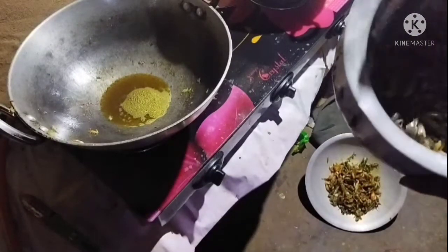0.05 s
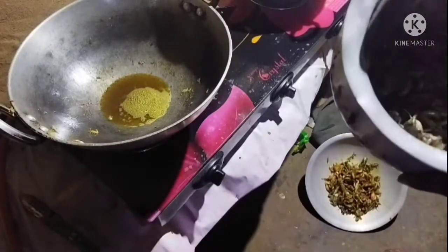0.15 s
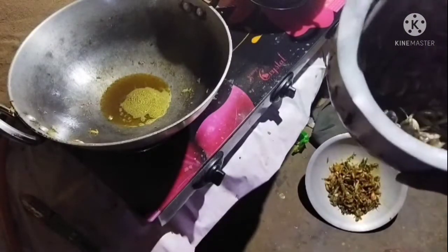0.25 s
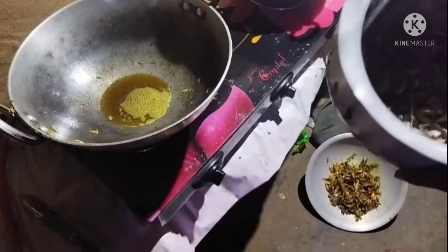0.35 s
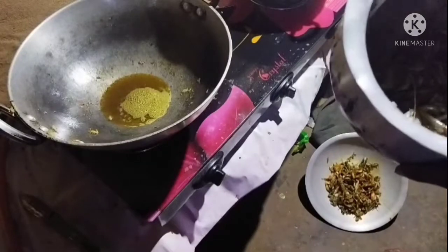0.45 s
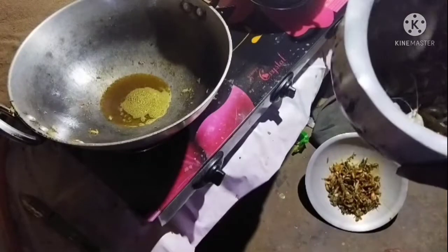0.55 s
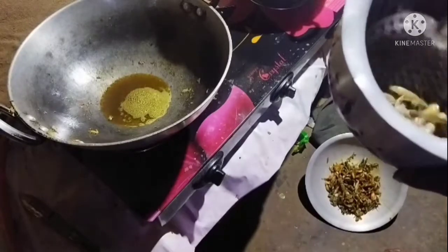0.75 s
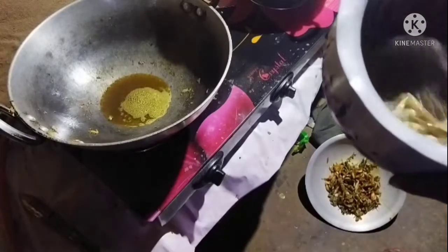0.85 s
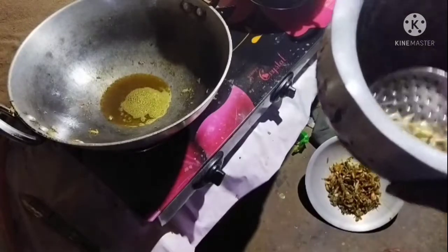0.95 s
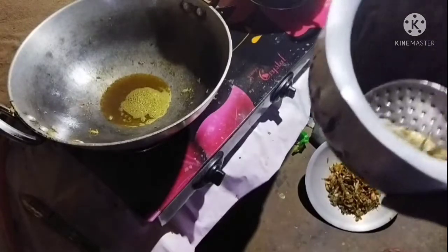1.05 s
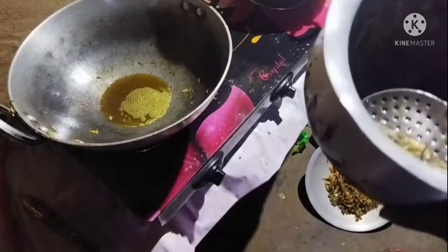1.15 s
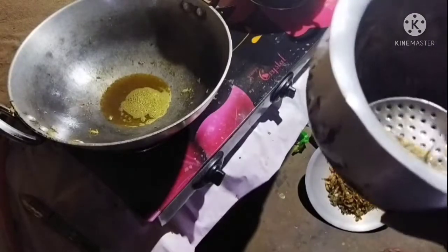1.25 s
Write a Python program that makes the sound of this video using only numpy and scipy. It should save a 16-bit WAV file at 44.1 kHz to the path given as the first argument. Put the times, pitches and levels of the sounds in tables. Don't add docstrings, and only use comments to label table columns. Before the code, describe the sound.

Two sharp metallic clanks of a skimmer against a pot, followed by light scraping and clinking outdoors

```python
import sys
import numpy as np
from scipy import signal
from scipy.fft import rfft, irfft
from scipy.io import wavfile
from scipy.ndimage import uniform_filter1d

SR = 44100
rng = np.random.default_rng(int(sys.argv[2]) if len(sys.argv) > 2 else 0)


def bounce(signal):
    frames = np.transpose(np.atleast_2d(signal))
    limited = np.clip(frames, -1, 1)
    pcm = np.round(limited * 32767).astype(np.int16)
    wavfile.write(sys.argv[1], SR, pcm)


def volts(x):
    e = np.asarray(x, float) / 20
    return 10 ** e


N = 57330

# pitch_hz, first_blow_db, second_blow_db, light_contact_db, t60_s
POT_MODES = [(207, -27, -39, -24, 0.017), (272, -43, -30.5, -6, 0.073), (524.7, -23.5, -28, -7, 0.077),
             (270, -55, -17.5, -20, 0.025), (340, -14.5, -20, -20, 0.034), (401, -20.5, -26, -10, 0.06),
             (438.7, -25.5, -20.5, -5.5, 0.13), (478.6, -15.5, -18, -2.5, 0.063),
             (581, -30.5, -45, -33, 0.093), (618, -41, -28.5, -10, 0.089), (666, -32.5, -58, -16, 0.23)]
RIM_MODES = [(1004, -41.5, -21.5, -9, 0.047), (1115, -23.5, -20, -4.5, 0.058),
             (1168.3, -23.5, -18, -0.5, 0.054), (1254, -31, -25.5, 0, 0.059), (1514, -38, -40.5, -12, 0.28),
             (1717, -71, -40, -12, 0.18), (1765, -27, -28.5, -0.5, 0.029), (1864, -30, -39, -15, .08)]
SKIMMER_MODES = [(2060, -28.5, -66, -7, 0.12), (2230, -24, -21.5, -8.5, 0.11),
                 (2307, -27.5, -35, -1.5, 0.081), (2593, -21, -54, -3.5, 0.13), (2740, -49, -11, 4, 0.03),
                 (2889, -14.5, -11.5, 2, 0.045), (2968, -13, -13, 1.5, 0.038), (3123, -42, -27, -1.5, 0.07),
                 (3269, -24.5, -55, 1, 0.047), (3350, -22, -25, 3.5, 0.07), (3514, -26, -30, -4, 0.094),
                 (3710, -45, -53, -9.5, 0.12), (4290, -33, -53, -22, 0.11), (4150, -50, -36, -8, 0.15)]
# pitch_hz, density_db (per Hz)
SHIMMER_COLOUR = [(2240, 7.5), (3800, -4.5), (4860, 1), (6610, 3.5), (7360, -8.5), (8770, 6), (11200, 2),
                  (12400, 3.5), (16000, -3)]
LIGHT_CONTACT = 3


def evened(x):
    return x / np.sqrt(np.mean(x ** 2) + 1e-20)


def read(points, hz):
    f, value = np.transpose(points)
    return np.interp(np.log(hz + 1), np.log(f + 1), value)


def coloured(x, points):
    hz = np.fft.rfftfreq(x.shape[-1], 1 / SR)
    floor = (points[0][0] * 0.077, -60)
    gain = volts(read([floor] + list(points), hz))
    return irfft(rfft(x) * evened(gain), x.shape[-1])


def slow_noise(size):
    return evened(uniform_filter1d(rng.standard_normal(N), size))


def dying(start, db, t60):
    t = np.arange(N) / SR - start
    rise = np.clip(t / 0.00065, 0, 1)
    return (t >= 0) * volts(db - 60 * np.maximum(t, 0) / t60) * rise


def mode(row, column, damping, skew):
    t = np.arange(SR // 4) / SR
    hz, t60 = row[0], damping * row[4]
    turn = 2 * np.pi * hz * t + 0.27 * skew * np.log(hz / 200)
    return volts(row[column] - 60 * t / t60) * np.sin(turn)


def ring(drive, modes, column, damping=0.7, bloom_s=0.0016):
    skews = rng.standard_normal((len(modes), 2, 1))
    bloom = 1 - np.exp(-np.arange(SR // 4) / SR / bloom_s)
    body = bloom * sum(mode(m, column, damping, skew) for m, skew in zip(modes, skews))
    return signal.fftconvolve(drive[None], body, axes=1)[:, :N]


def metal_noise(points):
    same, peak_db, peak_width_hz, count = 0.7, 12, 30, 160
    noise, hz = rng.standard_normal((3, N)), np.fft.rfftfreq(N, 1 / SR)
    ports = same * noise[0] + np.sqrt(1 - same ** 2) * noise[1:]
    peaks = np.zeros(len(hz))
    at = (rng.uniform(3600, 16000, count) * N / SR).astype(int)
    peaks[at] = rng.exponential(1, count)
    offset_hz = np.arange(-300, 301) * SR / N
    resonance = 1 / (1 + (offset_hz / peak_width_hz * 2) ** 2)
    fine = np.sqrt(1 + volts(2 * peak_db) * np.convolve(peaks, resonance, "same"))
    fine = fine / uniform_filter1d(fine, size=1500)
    return coloured(irfft(rfft(ports) * fine, N), points)


def hum():
    # pitch_hz, density_db (per Hz)
    hum_colour = [(35, -55), (62, -30), (83, -2.5), (118, -9.5), (220, 0.5), (363, -9.5), (516, -16),
                  (16000, -29.5)]
    # pitch_hz, likeness (0 to 1)
    hum_likeness = [(60, 0.84), (380, 0.79), (2400, 0.033), (15000, 0.05)]
    frames, hz = N // 256 + 5, np.fft.rfftfreq(1024, 1 / SR)
    a, b, c, d, patches = rng.standard_normal((frames, 513, 5)).T
    patches = evened(uniform_filter1d(uniform_filter1d(patches, 4, 0), 8, 1))
    same = np.clip(read(hum_likeness, hz), -1, 1)[:, None]
    left = a + 1j * b
    right = same * left + np.sqrt(1 - same ** 2) * (c + 1j * d)
    z = np.array([left, right]) * volts(read(hum_colour, hz)[:, None] + 0.5 * patches)
    return volts(-58.5) * evened(signal.istft(z, nperseg=1024, noverlap=768)[1][:, :N])


def motor():
    hz = 409 + 3 * slow_noise(2000)
    return volts(-67) * np.sin(2 * np.pi * np.cumsum(hz) / SR)


def bumps():
    # start_s, pitch_hz, level_db, t60_s
    bump_events = [
        (0.225, 90, -35, .025),
        (0.283, 81, -43.5, 0.086),
        (0.438, 90, -29, 0.03),
        (.5650, 60.6, -53, .04),
        (.8300, 40, -64, .05),
        (1.042, 113, -47, 0.098),
        (1.1400, 117, -65, 0.023),
        (1.233, 126, -49.5, 0.16),
    ]
    t, out = np.arange(N) / SR, np.zeros(N)
    for start, hz, db, t60 in bump_events:
        swing = np.sin(2 * np.pi * hz * (t - start))
        out += dying(start, db, t60) * np.clip((t - start) * hz, 0, 1) * swing
    return out


def yard(x):
    same, t60_s, first_s = 0.59, 0.2, 0.0059
    taps = np.zeros((2, SR // 2))
    at = np.arange(0, SR // 2 - 20, 20) + rng.integers(0, 20, (2, (SR // 2 - 1) // 20))
    np.put_along_axis(taps, at, rng.choice([-1., 1.], at.shape), 1)
    taps[0] = same * taps[1] + (1 - same) * taps[0]
    t = np.arange(SR // 2) / SR
    tail = taps * volts(-60 * t / t60_s) * (t > first_s)
    return signal.fftconvolve(x, tail / np.linalg.norm(tail[0]), axes=1)[:, :N]


def rub(slips, modes, best_hz):
    out = np.zeros((2, N))
    for m in modes:
        wander_db = 2.5 * slow_noise(round(0.035 * SR))
        favour_db = 5.5 * np.exp(-(np.log(m[0] / best_hz) / 0.074) ** 2)
        drive = slips * volts(wander_db + favour_db) * rng.choice([-1., 1.], N)
        tone = mode(m, LIGHT_CONTACT, 0.8, rng.standard_normal((2, 1)))
        out += signal.fftconvolve(drive[None], tone, axes=1)[:, :N]
    return out


def scrape():
    # start_s, pressure_db, then pot_db, rim_db and hiss_db (stroke speed) relative to pressure
    stroke = [(0.269, -37, -15, -8, 1.5), (0.334, -51, -23, -5, -4), (.39, -60, -15, -9, 8.5),
              (0.478, -45, -2.5, -12, 1), (0.552, -50.5, 4, 4.5, 7.5), (0.582, -56, 6.5, 0.5, 0),
              (0.607, -48.5, 3, 1, 2.5), (0.679, -52.5, -3, 3, 4.5), (0.716, -59, 3.5, -0.5, 8),
              (0.768, -48.5, -5, 3.5, 4), (0.804, -53, 5.5, 4.5, 5.5), (.821, -60, 6, 8, 9.5),
              (.84, -52.5, -5.5, -3, 1), (.87, -52, -6, -7, 1.5), (0.918, -51, -4, -2.5, 3),
              (0.992, -39.5, -17.5, -8, -2.5), (1.042, -44.5, -14, -3.5, 2.5), (1.117, -58, -8, -7.5, 2),
              (1.218, -47.5, -7, -2.5, -0.5), (1.268, -55, -12, -4.5, -1.5)]
    # start_s, skimmer_hz, pot_hz, rim_hz
    contact_path = [(.27, 3500, 600, 1520), (.33, 4150, 250, 1520), (.43, 4150, 252, 1480),
                    (.49, 2100, 267, 1090), (.57, 3060, 268, 1110), (.61, 3030, 392, 1180),
                    (.7, 3170, 448, 1170), (.78, 3170, 520, 1160), (.86, 3080, 438, 1200),
                    (.97, 2830, 483, 1213), (1.04, 2970, 470, 1340), (1.12, 3070, 456, 1270),
                    (1.22, 3070, 488, 1330)]
    slips_per_s, spread_db, start_s = 2200, 4.5, 0.24
    t = np.arange(N) / SR
    s, press_db, pot_db, rim_db, hiss_db = np.transpose(stroke)
    path_s, skimmer_hz, pot_hz, rim_hz = np.transpose(contact_path)
    strength = volts(spread_db * np.minimum(rng.exponential(1, N), 4))
    slips = strength * (rng.random(N) < slips_per_s / SR)
    grit = 0.77 + 0.32 * evened(uniform_filter1d(slips, 60))
    layers = [(rub(slips, SKIMMER_MODES, np.interp(t, path_s, skimmer_hz)), 0),
              (rub(slips, POT_MODES, np.interp(t, path_s, pot_hz)), pot_db),
              (rub(slips, RIM_MODES, np.interp(t, path_s, rim_hz)), rim_db),
              (grit * metal_noise(SHIMMER_COLOUR), hiss_db)]
    fade_in = np.clip((t - start_s) / 0.064, 0, 1)
    return fade_in * sum(volts(np.interp(t, s, press_db + db)) * evened(x) for x, db in layers)


def ticks():
    # start_s, pot_db, skimmer_db, shimmer_db
    tick_events = [(.3714, -64, -46.5, -48), (.4118, -70, -52, -37), (.2385, -38, -44, -42),
                   (.2440, -48, -38, -38), (.2500, -54, -34, -42), (.2630, -65, -60, -51),
                   (.2800, -65, -35, -52), (.3490, -49.5, -71, -60), (.4500, -48, -32.5, -39),
                   (.4560, -21, -23, -36), (.4650, -55, -37.5, -43.5), (.4700, -53, -32, -59),
                   (.4820, -49, -30.5, -49), (.4970, -51, -35, -56), (.5690, -50, -72, -66),
                   (.5899, -29.5, -31.5, -37.5), (0.6, -28, -34, -63), (.6650, -37.5, -44.5, -84),
                   (.7660, -44, -51, -55), (.7850, -49, -40, -59), (.8240, -59, -43.5, -60),
                   (.8315, -65, -52, -34), (.8450, -41, -45, -55), (.8495, -34.5, -36.5, -42),
                   (.8590, -31, -44.5, -53), (.9556, -45.5, -43.5, -69), (.9680, -52.5, -40.5, -55),
                   (.9840, -44, -41, -59), (1.0000, -64, -33, -44), (1.0130, -61, -27.5, -58),
                   (1.0330, -39, -33.5, -39), (1.0420, -68, -35, -58), (1.0510, -60, -35, -54),
                   (1.1801, -62, -33.5, -59), (1.1996, -47, -41, -55), (1.2095, -40.5, -31, -41.5),
                   (1.2140, -39.5, -31, -54), (1.2230, -46, -41, -56)]
    drive, shimmer = np.zeros((2, N)), np.zeros(N)
    for start, pot_db, skimmer_db, shimmer_db in tick_events:
        drive += volts([[pot_db], [skimmer_db]]) * dying(start, -10.5, 3.11 * 0.00096)
        shimmer += dying(start, shimmer_db, 0.035)
    pot, skimmer = drive * rng.standard_normal(N)
    touch = dict(column=LIGHT_CONTACT, damping=0.45, bloom_s=0.00035)
    out = ring(pot, POT_MODES + RIM_MODES, **touch)
    out += ring(skimmer, SKIMMER_MODES, **touch)
    return out + metal_noise(SHIMMER_COLOUR) * shimmer


def blows():
    # start_s, crack_db, crack_t60_s, shimmer_db, shimmer_t60_s
    blow_events = [
        (.2250, -12, 0.0135, -23.5, 0.069),
        (.4392, -12, 0.017, -26, 0.1),
    ]
    # pitch_hz, density_db (per Hz)
    crack_colour = [(100, -11), (500, 3.5), (1280, 0.5), (1750, -5.5), (2900, 3), (3950, -7.5), (6000, 0),
                    (8000, -12.5), (12900, -6), (16000, -13)]
    contact_s, skid_s, skid_db = 0.0013, 0.00067, -37
    t, out = np.arange(N) / SR, np.zeros((2, N))
    for k, (start, crack_db, crack_t60, shimmer_db, shimmer_t60) in enumerate(blow_events):
        push = np.sin(np.pi * np.clip((t - start) / contact_s, 0, 1)) ** 2
        snap = 1. * (np.arange(N) == round(start * SR))
        out += ring(push / push.sum(), POT_MODES, column=k + 1)
        out += ring(snap, RIM_MODES + SKIMMER_MODES, column=k + 1)
        skid = (t < start) * volts(crack_db + skid_db) * np.exp(np.minimum(t - start, 0) / skid_s)
        out += metal_noise(crack_colour) * (dying(start, crack_db, crack_t60) + skid)
        out += metal_noise(SHIMMER_COLOUR) * dying(start, shimmer_db, shimmer_t60)
    return out


def from_the_right(metal):
    # pitch_hz, lag_ms
    left_lag = [(340, .14), (700, .1), (1050, .27), (1550, .21), (1900, .24), (2240, .08), (2600, .17),
                (2930, .34), (3300, .3), (4100, .29), (8600, .25), (10300, .29), (13000, .3)]
    # pitch_hz, difference_db
    left_level = [(60, 1), (300, -0.5), (1290, -2), (2600, -1), (4400, -2), (8100, 2), (15000, -0.6)]
    hz = np.fft.rfftfreq(N, 1 / SR)
    lag_s = read(left_lag, hz) / 1000 * np.array([[1], [0]])
    late = np.exp(-2j * np.pi * hz * lag_s)
    level = volts(read(left_level, hz) * np.array([[.5], [-.5]]))
    return irfft(rfft(metal) * late * level, N)


def scene():
    hit = blows()
    metal = ticks() + scrape() + hit + volts(-14.5) * yard(hit)
    low_cut = signal.butter(3, 189, "high", fs=SR, output="sos")
    metal = signal.sosfilt(low_cut, metal)
    return from_the_right(metal) + hum() + motor() + bumps()


def low_pass(x):
    return signal.sosfilt(signal.butter(12, 16470, fs=SR, output="sos"), x)


def record(dry):
    gate_db, gate_from_hz, top_hz, loud_top_hz = -3, 1400, 15800, 16100
    drop_share, drop_db = 0.11, -30
    hz, t, z = signal.stft(dry, SR, nperseg=1024, noverlap=768)
    power = (abs(z) ** 2).mean(0)
    nearby = uniform_filter1d(power, size=16, axis=0) + 1e-20
    over_db = 10 * np.log10(power / nearby + 1e-9) - gate_db
    gain = 1 / (1 + np.exp(-over_db / 1.5))
    luck = rng.standard_normal((len(hz) // 4 + 1, len(t)))
    luck = evened(uniform_filter1d(luck, size=14, axis=1))
    held = uniform_filter1d(power, size=9, axis=1) + 1e-20
    band = uniform_filter1d(held, size=4, axis=0, origin=-2)
    strength = np.log(band / uniform_filter1d(held, size=40, axis=0))
    luck = luck + .45 * strength[::4] + 1.2 * (hz[::4, None] < 3000)
    luck = luck.repeat(4, axis=0)[:513]
    gain = gain * np.where(luck < np.quantile(luck, drop_share), volts(drop_db), 1)
    total = power.sum(0)
    jump = total > 4 * uniform_filter1d(total, size=13)
    untouched = (hz[:, None] < gate_from_hz) | jump
    gain = np.where(untouched, hz[:, None] < loud_top_hz, gain * (hz[:, None] < top_hz))
    mix = signal.istft(z * gain, SR, nperseg=1024, noverlap=768)[1][:, :N]
    return low_pass(mix)


dry = scene()
out = record(dry)
bounce(out)
```